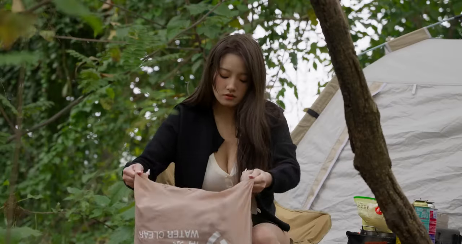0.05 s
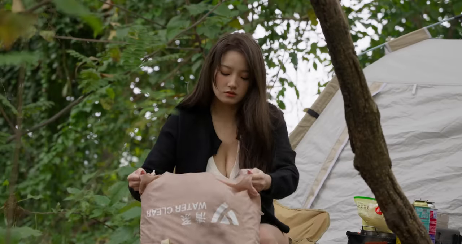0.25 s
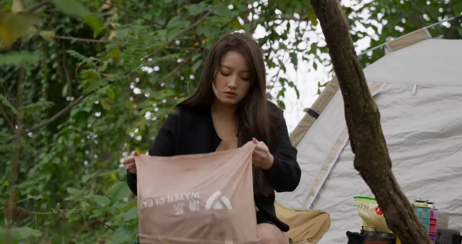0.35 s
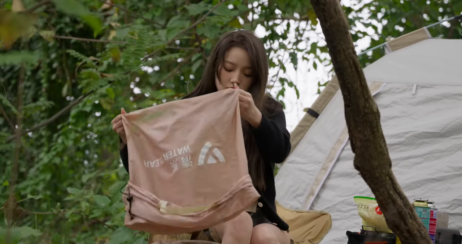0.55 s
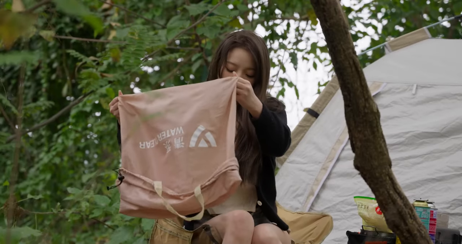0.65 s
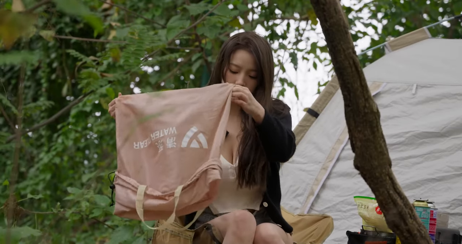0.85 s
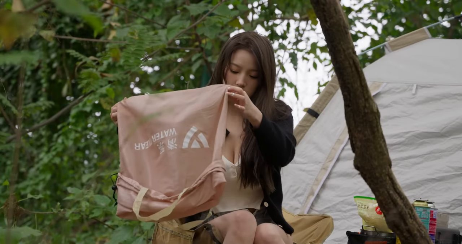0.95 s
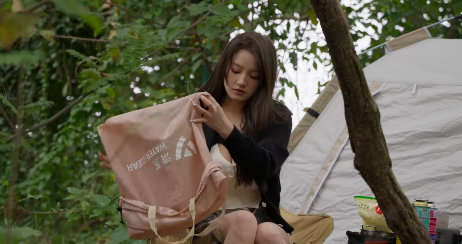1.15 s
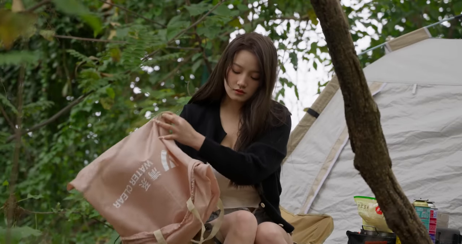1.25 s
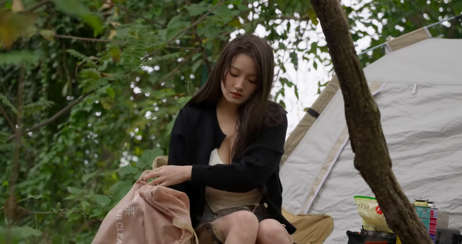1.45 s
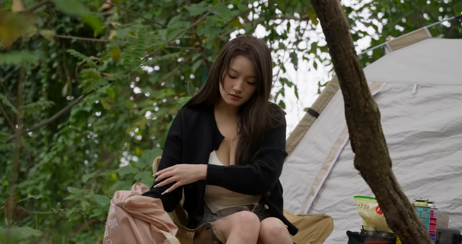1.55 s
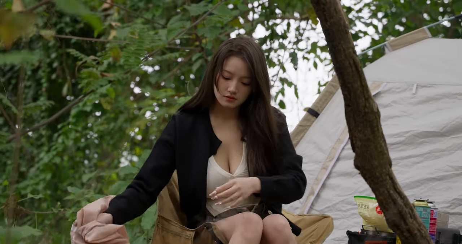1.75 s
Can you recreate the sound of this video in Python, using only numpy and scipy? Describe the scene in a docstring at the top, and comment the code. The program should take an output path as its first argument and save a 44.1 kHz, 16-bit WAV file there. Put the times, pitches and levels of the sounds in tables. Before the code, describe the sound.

A cloth bag is lifted and shaken open close to the microphone, swishing with crisp snaps and dull pops, then rustles softly as it is laid aside. A small bird whistles faintly over a low woodland rumble.

```python
"""A campsite in the woods: close by, a cloth bag is lifted, shaken open and laid aside.
The cloth swishes in tiny fibre slips, its weave zips as it slides, creases snap taut and pockets
of air pop dully. Behind it a small bird whistles a few rising notes over a low rumble and a soft
wash of leaves. Bag and bird echo briefly among the trees."""
import sys
import numpy as np
from scipy import signal
from scipy.fft import rfft, irfft
from scipy.io import wavfile
from scipy.ndimage import uniform_filter1d

SR = 44100
rng = np.random.default_rng(int(sys.argv[2]) if len(sys.argv) > 2 else 0)


def bounce(signal):
    """Save signal as a 16-bit WAV file at the path given by the first command-line argument."""
    frames = np.transpose(np.atleast_2d(signal))
    limited = np.clip(frames, -1, 1)
    pcm = np.round(limited * 32767).astype(np.int16)
    wavfile.write(sys.argv[1], SR, pcm)


N = 79380


def undb(db):
    """Gain of a level in dB."""
    return 10 ** (np.asarray(db) / 20)


def unit(x):
    """Scale to rms 1."""
    return x / np.sqrt(np.mean(x ** 2) + 1e-20)


def colour(x, curve):
    """Shape a signal with an EQ curve of (Hz, dB) points, then scale to rms 1."""
    hz, db = np.array(curve, float).T
    bin_hz = np.maximum(np.arange(N // 2 + 1) * SR / N, 1)
    gain = undb(np.interp(np.log(bin_hz), np.log(hz), db))
    return unit(irfft(rfft(x) * gain, N))


def drift(rate):
    """Smooth random modulation at rms 1, changing about rate times a second."""
    width = max(int(SR / rate), 2)
    smoothed = uniform_filter1d(rng.standard_normal(N), width, mode="wrap")
    return unit(uniform_filter1d(smoothed, width, mode="wrap"))


def tree_echoes(x, predelay_s, t60_s=0.36):
    """Trunks and leaves scatter a sound into a short reverb tail."""
    t = np.arange(N) / SR
    scatter = colour(rng.standard_normal(N), [(100, -7.5), (3500, 9.5), (14000, 7.5)])
    tail = scatter * undb(-60 * t / t60_s) * (t > predelay_s)
    return signal.fftconvolve(x, tail / np.sqrt(np.sum(tail ** 2)))[:N]


# The tone of the woodland bed. Each row: frequency in Hz, relative level in dB.
AIR_EQ = [(20, -1), (40, -7), (70, -6), (145, -5.5), (230, -15), (400, -21), (550, -18), (900, -14.5),
          (1700, -20), (2500, -23.5), (3500, -23.5), (5000, -27), (7000, -36.5), (9500, -34.5),
          (16000, -49)]
def woodland_air():
    """Low outdoor rumble and the soft, nearly steady wash of leaves."""
    level_db = -51.5 + 0.4 * drift(8)
    return undb(level_db) * colour(rng.standard_normal(N), AIR_EQ)


# The bird's notes. Each row: start in seconds, length in seconds, start pitch in Hz,
# end pitch in Hz, level in dB, waver as a share of the pitch.
BIRD_NOTES = [(0.33, .072, 3073, 3240, -51, 0.0086), (0.411, 0.047, 3350, 3330, -51.5, 0.0073),
              (1.434, .095, 3140, 3236, -56.5, .012), (1.542, 0.052, 3240, 3476, -55.5, 0.0176),
              (1.709, 0.057, 3530, 3550, -57, 0.073)]
def bird(t, fade_s=0.017, wet_db=-5):
    """Thin, wavering whistles, most of them rising, that echo among the trees."""
    song = np.zeros(N)
    for start, length, start_hz, end_hz, db, waver in BIRD_NOTES:
        glide_hz = np.interp(t, [start, start + length], [start_hz, end_hz])
        hz = glide_hz * (1 + waver * drift(200.5))
        whistle = unit(np.sin(2 * np.pi * np.cumsum(hz) / SR))
        gate = np.clip(np.minimum(t - start, start + length - t) / fade_s + 0.5, 0, 1)
        song += undb(db + 2 * drift(52)) * gate * whistle
    return song + undb(wet_db) * tree_echoes(song, predelay_s=0.023)


def weave_zip(t, peak_s=0.54, width_s=0.042, tick_hz=3637, level_db=-35):
    """Threads tick over each other at a rate that wanders with the speed of the slide."""
    hz = tick_hz * (1 + 0.06 * drift(200) + 0.096 * drift(3000))
    flicker = undb(2.8 * drift(400))
    tone = unit(np.sin(2 * np.pi * np.cumsum(hz) / SR) * flicker)
    swell = np.exp(-((t - peak_s) / width_s) ** 2)
    return undb(level_db) * tone * swell


# Dull pops of trapped air. Each row: start in seconds, pitch in Hz, level in dB,
# attack in seconds, decay in seconds.
POCKET_POPS = [(0.4882, 412.3, -21.5, 0.001, 0.01), (0.8401, 392, -16, 0.0037, 0.0044),
               (0.9379, 162, -22.5, 0.0029, 0.0087), (1.167, 353, -34.5, 0.0031, 0.0018)]
def air_pops(t, octave_db=-16.5):
    """A cloth panel flips and rings briefly on the air inside; wide swings add the octave."""
    out = np.zeros(N)
    for start, hz, db, attack, decay in POCKET_POPS:
        age = np.maximum(t - start, 0)
        swing = np.minimum(age / attack, 1) * np.exp(-np.maximum(age - attack, 0) / decay)
        phase = 2 * np.pi * hz * age
        octave = undb(octave_db) * swing * np.sin(2 * phase)
        out += undb(db) * swing * (np.sin(phase) + octave)
    return out


# Creases snapping taut. Each row: start in seconds, level in dB, decay in seconds, brightness in Hz.
CREASE_SNAPS = [(0.2302, -30, 0.0014, 3400), (0.4813, -27, 0.00021, 3500), (0.483, -36, 0.00029, 3000),
                (0.496, -20.5, 0.00066, 3020), (0.7187, -15.5, 0.00029, 3240),
                (0.721, -27.5, 0.00068, 8100), (0.8396, -44, .003, 9250), (0.877, -42.5, 0.0042, 5880),
                (0.934, -27, 0.0056, 10800), (0.9498, -23.5, 0.0024, 1730)]
def crease_snaps(t):
    """Each crease pulls straight in a crisp burst, a few milliseconds long or less."""
    out = np.zeros(N)
    for start, db, decay, hz in CREASE_SNAPS:
        envelope = (t >= start) * np.exp(-np.abs(t - start) / decay)
        burst = np.sign(rng.standard_normal(N)) * envelope
        snap_eq = [(hz / 10, -4), (hz / 2, 0), (hz, 0), (hz * 2, -12), (hz * 10, -50)]
        out += undb(db) * np.std(burst) * colour(burst, snap_eq)
    return out


def fibre_slips(slips_per_s=14000, flutter_db=1.16):
    """Dense tiny clicks of fibres catching and letting go, in uneven flurries."""
    hits = rng.random(N) < slips_per_s / SR
    trim_db = -0.1 * np.minimum(rng.exponential(size=N), 3)
    clicks = hits * undb(trim_db) * rng.standard_normal(N)
    return clicks * undb(flutter_db * drift(170))


# The body of the rustling folds. Each row: frequency in Hz, relative level in dB.
RUSTLE_EQ = [(40, 6), (150, -5), (400, -24), (800, 1), (1500, 5), (2500, 1), (4000, -2.5), (6500, -9.5),
             (9000, -22), (16000, -35)]
# The sheen of the hissing fibres. Each row: frequency in Hz, relative level in dB.
HISS_EQ = [(1000, -16), (2500, -103), (3800, 4), (6500, -6), (9000, -3.5), (11000, -9.5), (16000, -14)]
# The moves of the bag. Each row: peak time, rise and fall in seconds, flap pitch in Hz,
# then rustle, flap and hiss levels in dB.
BAG_MOVES = [(0.07, 0.049, 0.037, 350, -54, -57.5, -61), (0.14, 0.027, 0.024, 269, -56, -52, -83),
             (0.242, 0.029, 0.035, 260, -47, -45.5, -50), (0.41, 0.062, 0.11, 368, -59.5, -52.5, -63),
             (0.497, 0.028, 0.0078, 370, -35.5, -40.5, -43), (0.523, 0.022, .018, 269, -35.5, -36, -34),
             (0.547, 0.019, 0.032, 350, -41.5, -57, -34.5), (0.567, 0.024, 0.031, 287, -40.5, -45, -41),
             (0.672, 0.056, 0.1, 340, -50.5, -52, -50), (0.723, 0.019, 0.024, 370, -34, -32, -37.5),
             (0.8, 0.045, 0.27, 386, -52.5, -51.5, -54.5), (0.933, 0.016, 0.018, 730, -43.5, -37.5, -43.5),
             (0.95, 0.013, 0.014, 324, -42.5, -36, -39), (0.985, 0.085, 0.023, 410, -46, -48.5, -55),
             (1.1, 0.06, 0.16, 346, -53, -51.5, -56.5), (1.41, 0.039, 0.069, 280, -55, -79, -67),
             (1.528, 0.0077, .02, 304, -46, -43.5, -64), (1.62, 0.11, 0.067, 258, -57, -61, -62.5)]
def cloth_swishes(t, skirt_db=-11):
    """Each move swells and dies away: a flapping panel, rustling folds and hissing fibres."""
    flap, rustle_power, hiss_power = np.zeros((3, N))
    for peak, rise, fall, hz, rustle_db, flap_db, hiss_db in BAG_MOVES:
        from_peak = np.where(t < peak, (peak - t) / rise, (t - peak) / fall)
        effort = np.exp(-from_peak ** 1.37)
        panel_eq = [(hz / 10, 2 * skirt_db), (hz / 2, skirt_db), (hz * 0.656, 0),
                    (hz * 1.18, 0), (hz * 2, skirt_db), (hz * 10, -60)]
        flap += undb(flap_db) * effort * colour(rng.standard_normal(N), panel_eq)
        rustle_power += (undb(rustle_db) * effort) ** 2
        hiss_power += (undb(hiss_db) * effort) ** 2
    rustle = np.sqrt(rustle_power) * colour(fibre_slips(), RUSTLE_EQ)
    hiss = np.sqrt(hiss_power) * colour(fibre_slips(), HISS_EQ)
    return flap + rustle + hiss


def scene():
    """A mono mix: the bag up front with a touch of echo, the bird and the wood behind it."""
    t = np.arange(N) / SR
    bag = cloth_swishes(t) + crease_snaps(t) + air_pops(t) + weave_zip(t)
    echoes = undb(-11) * tree_echoes(bag, predelay_s=0.0077)
    return (bag + echoes + bird(t) + woodland_air())[None]


def record(dry):
    """A steep low-pass takes off the very top, above 16.1 kHz."""
    return signal.sosfilt(signal.ellip(10, 0.2, 80, 16100, fs=SR, output="sos"), dry)


dry = scene()
out = record(dry)
bounce(out)
```